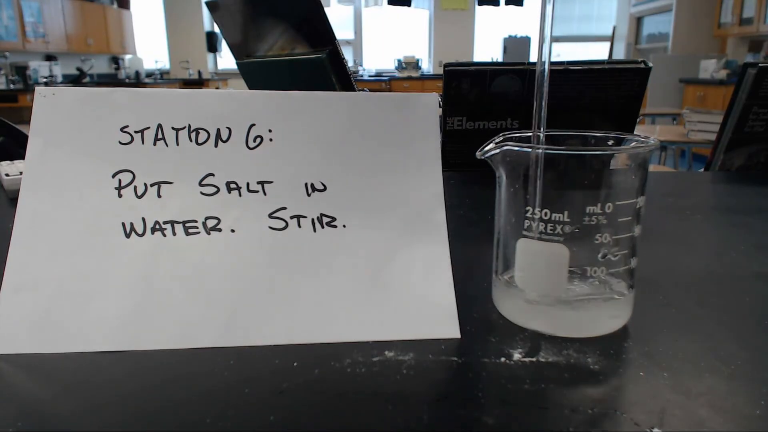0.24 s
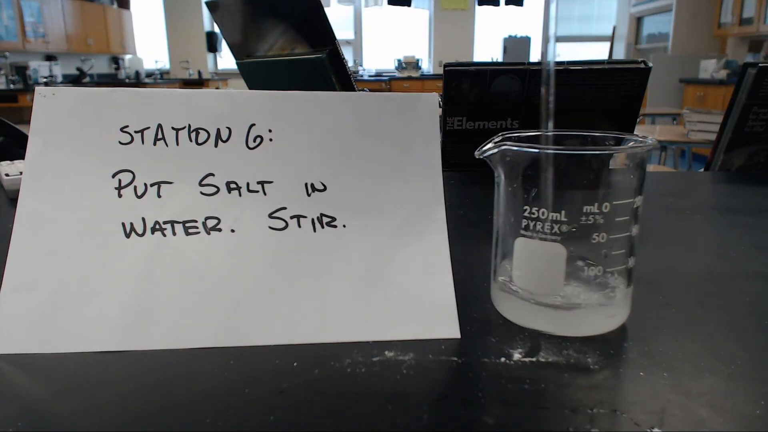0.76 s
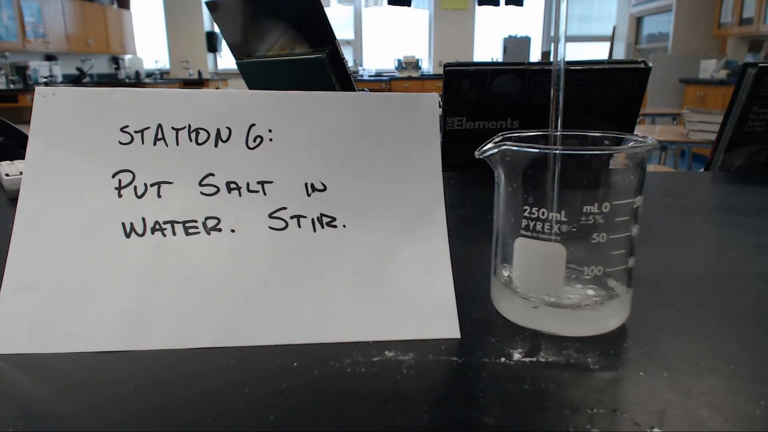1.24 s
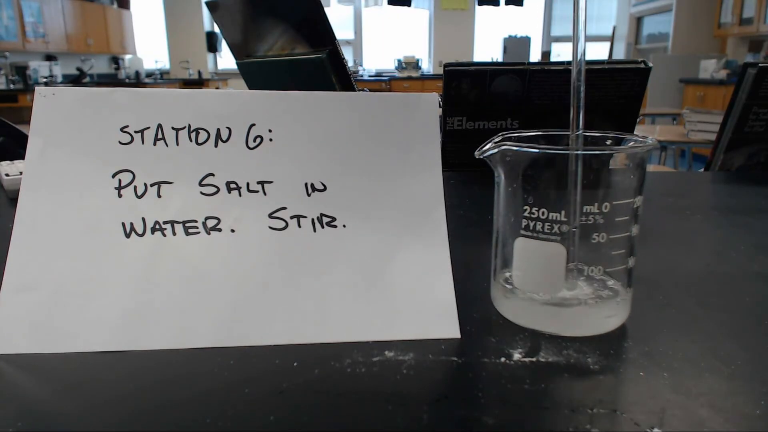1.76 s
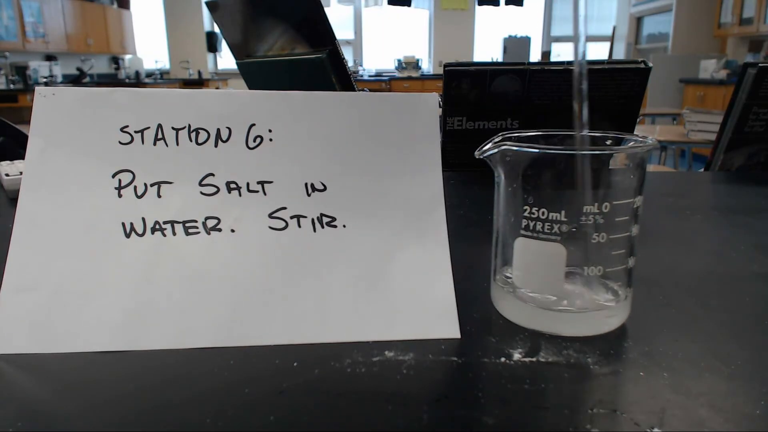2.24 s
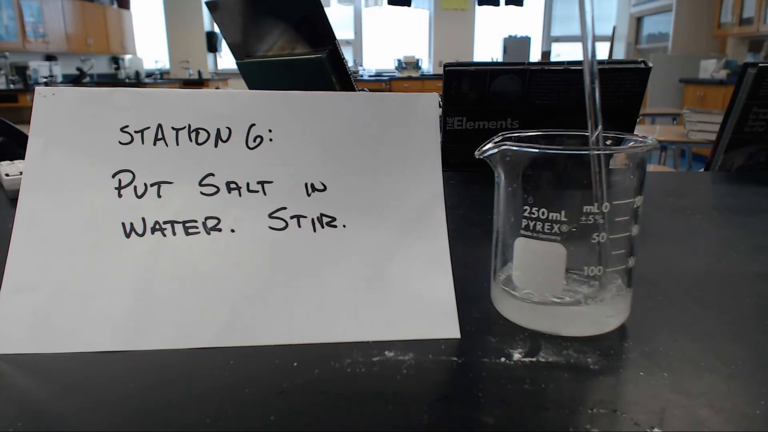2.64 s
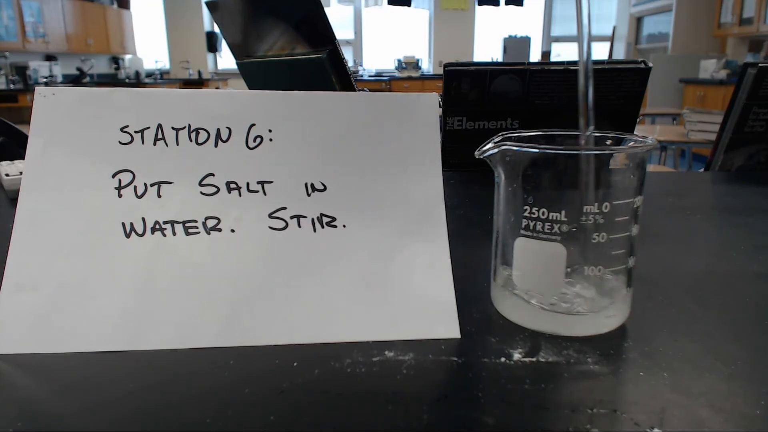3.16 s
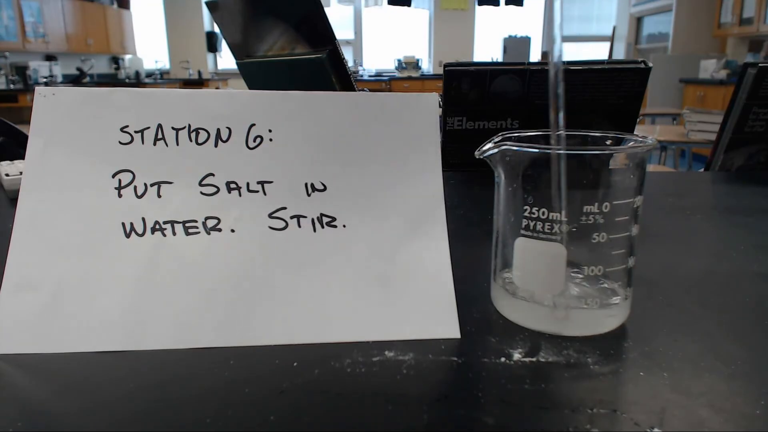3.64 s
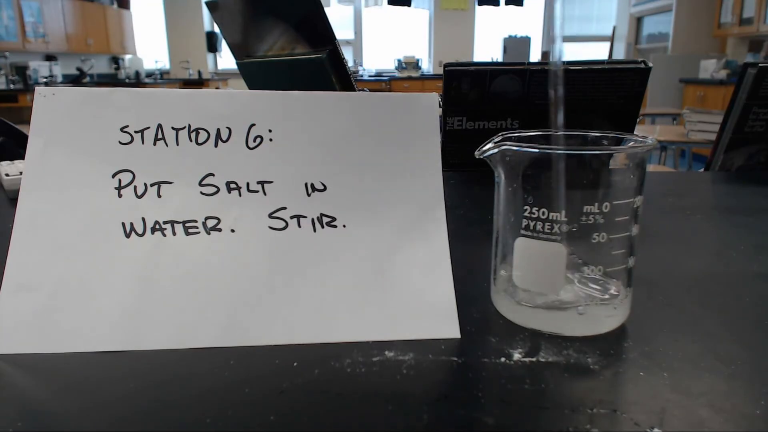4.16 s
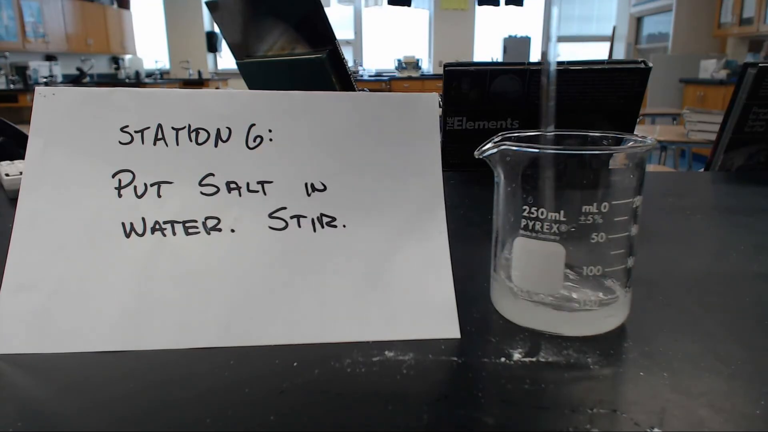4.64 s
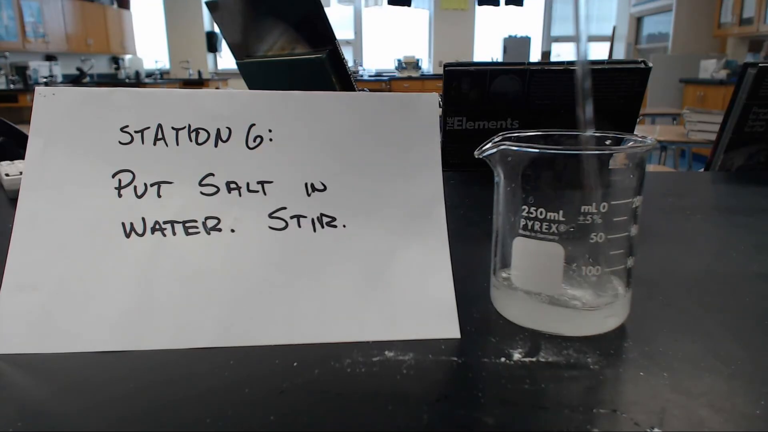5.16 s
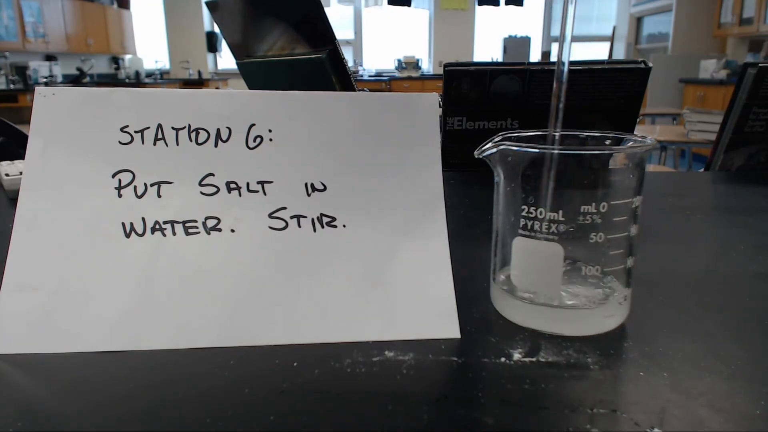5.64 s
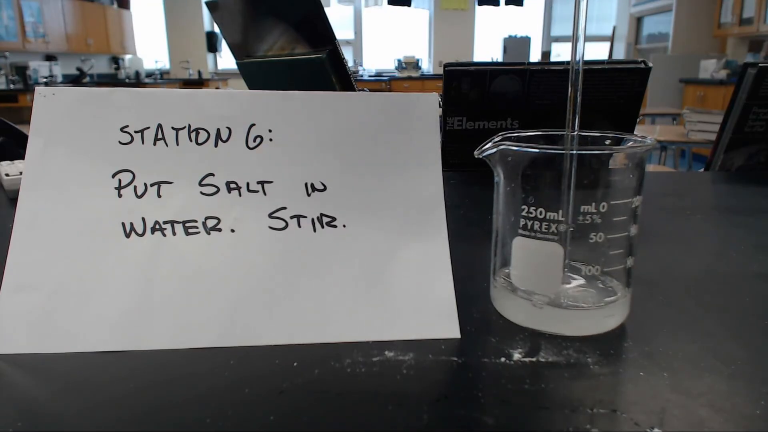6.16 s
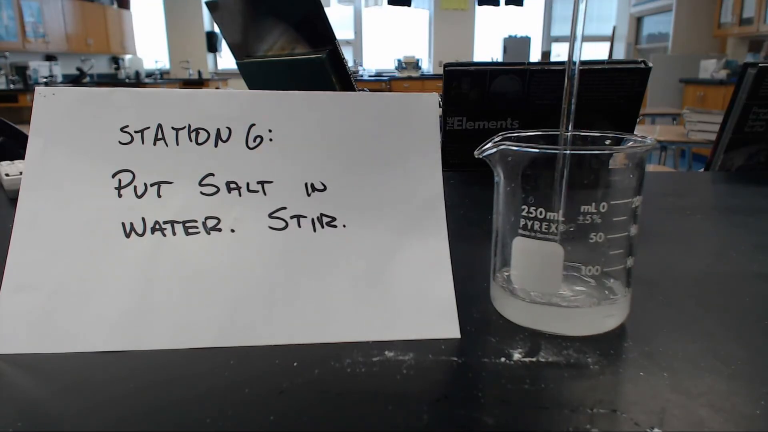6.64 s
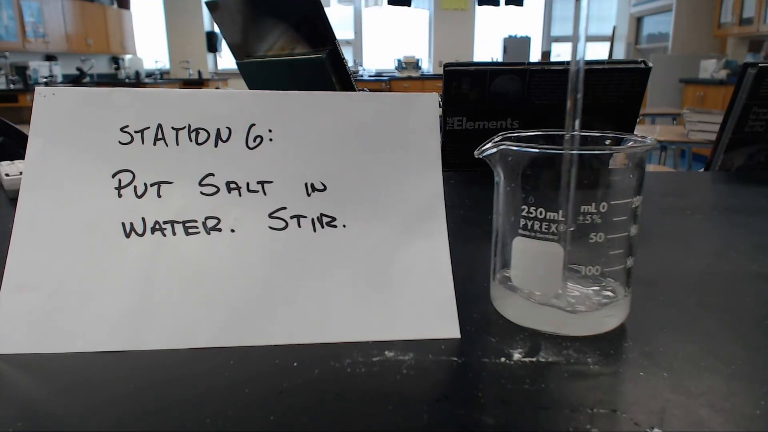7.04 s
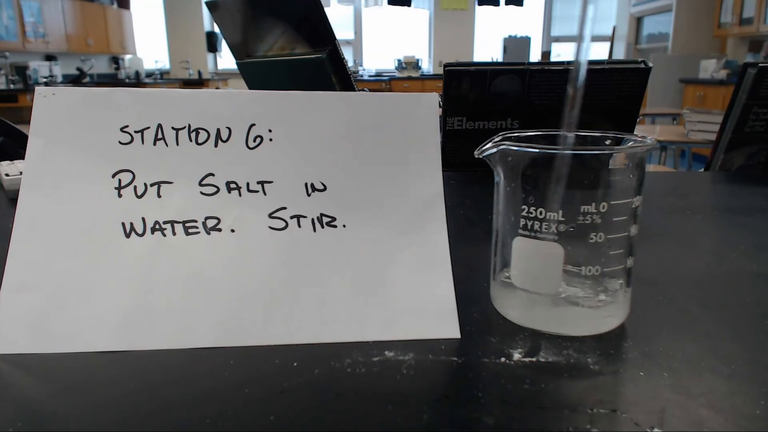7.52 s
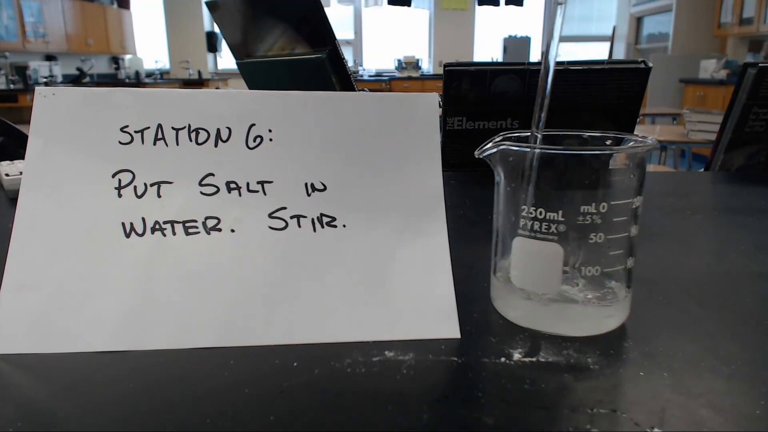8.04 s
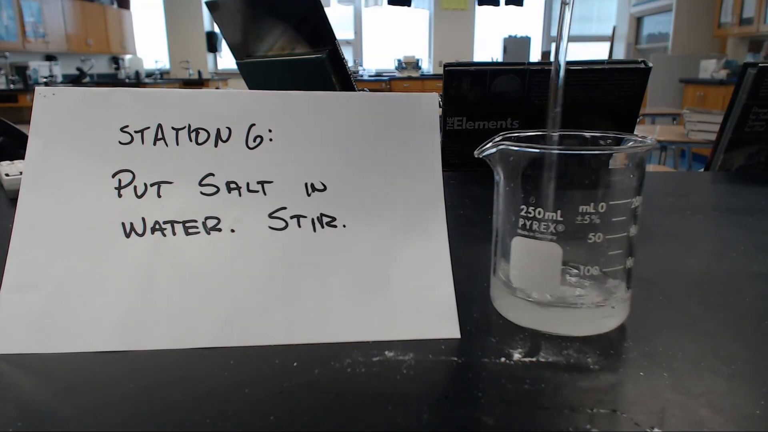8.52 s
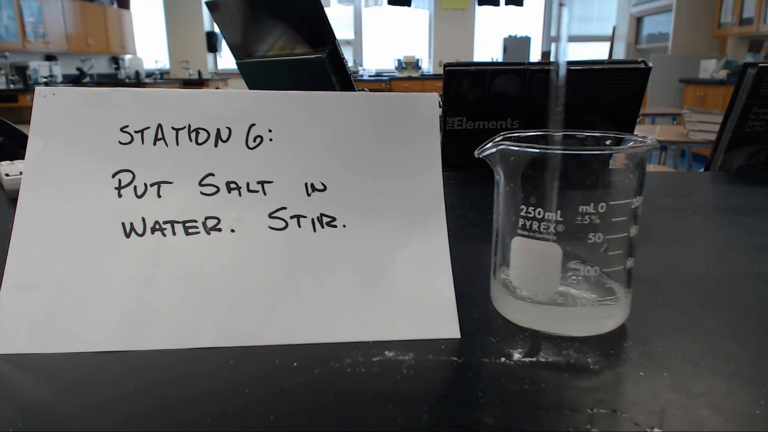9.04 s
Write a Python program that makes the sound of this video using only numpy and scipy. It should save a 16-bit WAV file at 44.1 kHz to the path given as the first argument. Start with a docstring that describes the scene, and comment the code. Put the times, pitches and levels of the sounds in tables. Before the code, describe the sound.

A glass rod stirs salt into shallow water in a glass beaker, heard very close with a thin, band-limited microphone that overloads on hard hits. Light ticks lead to a loud clink at 0.2 seconds, then a cluster at 0.5-0.9 with a gritty salt scrape. From 1 to 2 the clinks are sparser and softer; from 2.2 to 4.5 they come steadily, about every 0.2 seconds, with tiny bounces. A brisk flurry runs 4.9-5.7, some blows thudding in the bench, then a short gap, single hits at 6.2 and a hard one at 6.55. From 7.2 the pace rises, becoming a crowded bright rattle from 7.8 to 8.8, with last strong clinks around 9-9.2. Each is a sharp crack with a short hollow, glassy ring. Faint watery, grainy swishing comes and goes; a small dry room and barely audible ventilation lie behind.

```python
"""In a laboratory, a glass rod stirs salt into a little water and clinks unevenly on a glass beaker.
Each blow on wall or bottom cracks and excites decaying modes of the beaker, the rod and the air above
the water; hard blows thud in the bench. Salt grains grate as narrow-band noise, and water and salt wash
the wall as noise filtered by the modes. A close narrow-band microphone overloads on the hardest blows,
with a little reverberation and a faint ventilation rumble behind."""
import sys
import numpy as np
from scipy import signal
from scipy.fft import rfft, irfft
from scipy.io import wavfile
from scipy.ndimage import uniform_filter1d

SR = 44100
rng = np.random.default_rng(int(sys.argv[2]) if len(sys.argv) > 2 else 0)


def master(y):
    """Save y as 16-bit WAV."""
    cut = np.clip(np.atleast_2d(y).T, -1, 1)
    pcm = np.round(cut * 32767)  # scale
    wavfile.write(sys.argv[1], SR, pcm.astype(np.int16))


N = 409688

# Spectrum of the ventilation: (frequency [Hz], relative density [dB])
RUMBLE_SPECTRUM = [(50, -20.5), (162, 4), (263, -11), (384, -22), (8000, -34.5), (10400, -105)]
# Decay of the room: (frequency [Hz], t60 [s])
ROOM_DECAY = [(1000, 0.16), (8000, 0.18)]
# Strength of the water's swirl: (time [s], level [dB])
SWIRL_LEVEL = [(0, -53.5), (.95, -47), (1.081, -111), (1.3, -50), (2.05, -62), (2.199, -83.5),
               (2.45, -91.5), (2.598, -48.5), (3.701, -65), (4.501, -44), (4.85, -49.5), (5.651, -51),
               (5.801, -100), (6.401, -66.5), (6.6, -48.5), (7.099, -68), (7.4, -46), (9.29, -54.5)]
# Scrapes of the rod through salt: (time [s], peak level [dB], starting pitch [Hz], length [s])
SALT_RUBS = [(0.344, -35, 4360, 0.047), (0.605, -31.5, 4150, 0.046), (0.761, -14, 4000, 0.044),
             (2.267, -35.5, 3140, 0.045), (4.305, -33.5, 4090, 0.088), (6.579, -33.5, 4140, 0.15),
             (7.059, -29, 4050, 0.13), (7.325, -32, 4510, 0.031), (7.475, -27, 2850, 0.064),
             (7.921, -26.5, 2860, 0.093), (8.874, -29, 4100, 0.059)]
# Light touches of the rod and blips of the water: (time [s], peak level [dB], pitch [Hz])
LIGHT_TICKS = [(.004, -25.5, 1005), (0.029, -32, 3290), (0.112, -30, 4140), (0.121, -17, 916),
               (0.201, -25.5, 3300), (0.3, -26, 880), (0.311, -25.5, 4730), (0.524, -23, 710),
               (1.332, -29, 830), (1.556, -23.5, 1920), (1.867, -36.5, 4070), (1.95, -29, 3270),
               (2.384, -40.5, 3440), (2.554, -38, 2390), (2.371, -40.5, 1320), (2.679, -28.5, 3140),
               (2.852, -24.5, 1320), (2.885, -40, 7540), (2.91, -32, 3350), (3.165, -28.5, 4020),
               (3.476, -24, 860), (3.659, -32, 800), (4.09, -25.5, 874), (4.265, -24, 792),
               (4.665, -37.5, 2540), (4.728, -37, 4110), (4.396, -14.5, 1010), (5.611, -27.5, 3240),
               (6.395, -22.5, 833), (7.359, -21.5, 930), (7.577, -26.5, 4150), (8.845, -30.5, 807)]
# Hard blows heard in the bench: (time [s], level of each note before its onset [dB])
BENCH_THUDS = [(0.217, -5), (0.782, 6), (4.91, 5), (5.002, 1), (6.552, 11.5), (7.998, 5.5), (9.134, -1.5)]
# Long clear wall tones, low, high and twin of the high one: (frequency [Hz])
WALL_TONES_HZ = [1486, 4097, 4011]
# The same tones: (t60 [s], wavering [dB], response level when grains and water stir it [dB])
WALL_TONES = [(0.31, 3.5, -18), (0.28, 3.5, -22), (0.25, 8, -22)]
# Modes rung by a blow: (frequency [Hz])
MODES_HZ = [580, 690, 795, 892, 1046, 1263, 1955, 2700, 3270, 3403, 4220, 4480, 5900, 7045, 7422, 7522]
# The same modes: (level [dB], t60 [s])
MODES = [(-8, 0.045), (-9, 0.04), (-4, 0.051), (-3, 0.057), (-9, 0.04), (-12, 0.064), (-4, 0.022),
         (-17, 0.032), (-9.5, 0.029), (0.5, 0.036), (3.5, 0.018), (0, 0.016), (-8, 0.02), (-16, 0.13),
         (-1, 0.04), (-14, 0.13)]
# Centres of the zones air, low wall, rod, rim and high wall: (frequency [Hz])
ZONE_CENTRES_HZ = [850, 1600, 3400, 4300, 7300]
# Answer of these zones to a blow: (offset [dB], share of low ring [1], share of treble ring [1])
ZONE_ANSWERS = [(-3, 1, 0.22), (0, 0.71, 0.18), (-11, 0.26, 0.22), (-13.5, 0.025, 0.15), (-6, 0.023, 0.89)]
# Blows; deep ones ring low, sharp ones high: (time [s], peak level [dB], low ring drive [dB],
# treble ring drive [dB], low wall tone level [dB], high wall tone level [dB])
ROD_BLOWS = [(0.218, 8.5, -16, -14.5, -40, -38), (0.465, -5, -55, -16, -62, -49.5),
             (0.69, -7.5, -37.5, -25, -45.5, -46), (0.784, -0.5, -17.5, -19.5, -31.5, -29),
             (0.838, -2.5, -15, -33, -45, -35), (0.939, -9.5, -16, -45, -61.5, -61.5),
             (1.259, -11, -33, -16, -47.5, -36.5), (1.508, -4.5, -19, -20.5, -29, -38),
             (1.646, -16.5, -23.5, -101, -44.5, -42), (1.717, -9, -22.5, -65, -52.5, -43),
             (2.034, -21.5, -10.5, -93, -72, -63), (2.214, -1, -14.5, -11.5, -38.5, -33.5),
             (2.58, -5, -5, -19, -38.5, -35), (2.755, -15.5, -4.5, -41, -45, -54),
             (2.942, -7, -6, -30.5, -29.5, -34.5), (3.098, -1, -21.5, -16.5, -41, -63),
             (3.267, -5.5, -27, -7.5, -55.5, -72), (3.444, -4.5, -33.5, -10.5, -42, -50),
             (3.623, -23, 5, -25, -72, -50), (3.817, -4, -20.5, -46, -43, -37.5),
             (3.952, -3, -9, -58, -36, -35), (4.033, -11.5, -32.5, -16, -47, -46),
             (4.4, -1, -21.5, -18.5, -34.5, -28.5), (4.533, -6.5, -29.5, -8.5, -69, -45),
             (4.912, 0, -13.5, -15.5, -29.5, -26.5), (5.001, 0.5, -18.5, -15.5, -53, -44),
             (5.073, -7.5, -24, -59, -35, -39), (5.112, -6.5, -15.5, -24.5, -43, -35),
             (5.221, -10, -41, -10.5, -52.5, -43), (5.363, 3, -16.5, -40.5, -45, -38),
             (5.54, -2, -20.5, -13.5, -36.5, -31.5), (5.682, -1, -19.5, -7, -46, -41),
             (6.205, 0.5, -10.5, -39.5, -38.5, -36.5), (6.553, 5.5, -18.5, -31, -58.5, -32),
             (6.717, -1.5, -10.5, -24.5, -45, -28.5), (6.847, -7, -32, -5.5, -40.5, -45),
             (6.892, -4, -17.5, -39.5, -49, -36), (7.215, -5, -58, -8, -74, -35),
             (7.382, -5.5, -19.5, -6.5, -40, -56), (7.416, -13.5, -4.5, -46, -62, -45),
             (7.605, -1.5, -35, -20, -57, -38), (7.693, -3, -16.5, -16, -32.5, -45),
             (7.829, -10, -12, -43, -45, -44), (7.872, -3, -11.5, -15, -39.5, -28.5),
             (7.997, 1, -13, -14.5, -25.5, -23.5), (8.102, -0.5, -33.5, -18, -36.5, -36),
             (8.168, -3, -29, -29, -42, -29.5), (8.233, -3.5, -39, -12.5, -41, -43),
             (8.327, -1, -24, -16, -37, -24.5), (8.45, -3.5, -26.5, -22, -51, -31.5),
             (8.547, 1.5, -34.5, -39, -22, -36), (8.592, 2, -22.5, -18, -33, -43),
             (8.634, -1.5, -23, -31, -44, -27.5), (8.696, 5, -24, -22, -33.5, -37),
             (8.76, -8, -19, -55.5, -43, -50.5), (8.987, -4, -58, -24, -45, -36),
             (9.074, -1, -27.5, -16, -34, -20.5), (9.133, 0.5, -28, -28, -34, -28),
             (9.223, 6, -20.5, -14, -41, -23)]
# Bounces of the rod soon after a blow: (time [s], level relative to its blow [dB])
ROD_BOUNCES = [(0.239, -15.5), (0.794, -5), (3.1057, -14.5), (4.0437, -9), (5.0152, -17), (5.24, -13),
               (5.5546, -8.5), (5.696, -12.5), (7.618, -7), (8.2456, -7), (8.7142, -10)]

RUMBLE_DB = -69  # rms
SCRAPE_RISE_PER_S = 1.1  # climb as the rod speeds up, share of the starting pitch
TOUCH_T60, CLICK_T60 = 0.05, 0.02  # s
TWIN_DB = -9  # relative to the high wall tone
AIR_DRIFT = 0.024  # the low notes move with the sloshing water, share of pitch
WAVER_DB = 5.5  # moving water makes each ring waver
CROWD_HZ, CROWD_DB = 160, 7.0  # width and level spread of the short modes round each main one
CRACK_DB, CRACK_SHARE = 13.5, 0.58  # the crack grows with the treble ring
MIC_HZ, EDGE_HZ = 7900, 16600  # cutoffs before and after overload


def gain_of(db):
    """Logarithmic levels: 20 dB is a factor of ten in amplitude."""
    return 10 ** (np.asarray(db) / 20)


def evened(x):
    """Power normalization: scales to rms 1."""
    return x / np.sqrt(np.mean(x ** 2) + 1e-20)


def read(points_hz, values, hz):
    """Logarithmic frequency scale: interpolates in straight lines along it."""
    return np.interp(np.log(hz + 1), np.log(np.add(points_hz, 1)), values)


def add(mix, s, sound):
    """Superposition: adds a sound to the mix at s seconds."""
    part = mix[round(s * SR):][:len(sound)]
    part += sound[:len(part)]


def waver(depth_db, count):
    """Amplitude modulation: slow random level changes in dB, one row for each ring."""
    steps = evened(uniform_filter1d(rng.standard_normal((count, 160)), 5, 1))
    return uniform_filter1d(depth_db * steps.repeat(100, 1), 200, 1)


def glass(hz):
    """Modal superposition: sums resonances, of which long rings peak higher and narrower."""
    modes = [(f, db, t60) for f, (db, t60) in zip(MODES_HZ, MODES)]
    modes += [(f, db, t60) for f, (t60, _, db) in zip(WALL_TONES_HZ, WALL_TONES)]
    return sum(gain_of(db) * t60 / 3.2 / (1 + 1j * (hz - f) * t60) for f, db, t60 in modes)


def rumble():
    """Stationary broadband noise: the ventilation is white noise coloured towards the bass."""
    hz = np.fft.rfftfreq(N, 1 / SR)
    colour = gain_of(read(*np.transpose(RUMBLE_SPECTRUM), hz))
    noise = irfft(rfft(rng.standard_normal(N)) * colour, N)
    return gain_of(RUMBLE_DB) * evened(noise)


def lab(x):
    """Reverberation: convolution with taps of random sign, each band dying at its own speed."""
    taps = np.zeros(SR // 2)
    at = np.arange(120, SR // 2 - 20, 20)
    taps[at + rng.integers(0, 20, len(at))] = rng.choice([-1., 1.], len(at))
    hz, t, z = signal.stft(taps, SR, nperseg=256)
    t60 = read(*np.transpose(ROOM_DECAY), hz)[:, None]
    tail = signal.istft(z * gain_of(-60 * t / t60), SR, nperseg=256)[1]
    return signal.fftconvolve(x, tail / np.linalg.norm(tail))[:N]


def slosh(patchy_db=4.0, surge_db=6.5, grit_db=4.0, tilt_db=1.5, dull_db=-9,
          air_db=-21, air_hz=850, width_hz=130):
    """Filtered turbulence: water and salt noise passes through the modes and air in patches and surges."""
    frames, hz = N // 64 + 5, np.fft.rfftfreq(256, 1 / SR)
    a, b, patches = rng.standard_normal((frames, len(hz), 3)).T
    patches = evened(uniform_filter1d(uniform_filter1d(patches, 4, 0), 18, 1))
    surges = evened(uniform_filter1d(rng.standard_normal(frames), 22))
    # grains knock in eight frequency bands
    knocks = np.minimum(uniform_filter1d(rng.exponential(1, (frames, 8)), 2, 0), 5)
    grit = knocks.repeat(17, 1)[:, :len(hz)].T
    z = (a + 1j * b) * gain_of(patchy_db * patches + surge_db * surges + grit_db * grit)
    wash = signal.istft(z, nperseg=256, noverlap=192)[1][:N]
    fine_hz = np.fft.rfftfreq(N, 1 / SR)
    air = gain_of(air_db) / (1 + ((fine_hz - air_hz) / width_hz) ** 2)
    tilt = tilt_db * np.log2(fine_hz / 1000 + .01)  # dB per octave
    colour_db = tilt - 64 * (fine_hz < 480) + dull_db * (fine_hz > 5000)
    colour = (abs(glass(fine_hz)) + air) * gain_of(colour_db)
    swirl_db = np.interp(np.arange(N) / SR, *np.transpose(SWIRL_LEVEL))
    return evened(irfft(rfft(wash) * colour, N)) * gain_of(swirl_db)


def rubs(sharpness=22, wide_db=7, lumpy_db=3.5, skew=1.4):
    """Friction noise: crushed grains swell in a narrow climbing band that stirs the glass a little."""
    out, t, hz = np.zeros(N), np.arange(8192) / SR, np.fft.rfftfreq(8192, 1 / SR)
    for s, peak_db, pitch_hz, length in SALT_RUBS:
        grains, other, lumps = rng.standard_normal((3, 8192))
        swell = np.sin(np.pi * np.minimum(t / length, 1) ** skew)
        stroke = swell * gain_of(lumpy_db * evened(uniform_filter1d(lumps, 200)))
        # narrow noise round 0 Hz, then shifted up to the gliding pitch
        r = np.exp(-2 * np.pi * pitch_hz / sharpness / SR)
        slow = signal.lfilter([(1 - r) ** 2], [1, -2 * r, r ** 2], (grains + 1j * other) * stroke)
        cycles = pitch_hz * (t + SCRAPE_RISE_PER_S * t ** 2 / 2)
        band = 2 * (slow * np.exp(2j * np.pi * cycles)).real
        wide = gain_of(wide_db) * rfft(grains * stroke) * glass(hz)
        sound = irfft(rfft(band) * (1 + glass(hz)) + wide)
        add(out, s, gain_of(peak_db) * sound / abs(sound).max())
    return out


def ticks(width_hz=150, wide_db=9, dull_hz=4500, click_db=-21, ragged_db=9.5):
    """Resonant excitation: a gritty touch rings its note and, fainter, the glass, with a ragged click."""
    out, t, hz = np.zeros(N), np.arange(8192) / SR, np.fft.rfftfreq(8192, 1 / SR)
    for s, peak_db, pitch_hz in LIGHT_TICKS:
        touch, click, ragged = rng.standard_normal((3, 8192))
        patch = 1 / (1 + 1j * (hz - pitch_hz) / width_hz) ** 2
        whole = gain_of(wide_db) * glass(hz) / (1 + (hz / dull_hz) ** 4)
        ring = rfft(touch * gain_of(-60 * t / TOUCH_T60)) * (patch * (1 + glass(hz)) + whole)
        # the unevenness of the click runs along frequency
        ragged_colour = gain_of(ragged_db * evened(uniform_filter1d(ragged[:len(hz)], 100)))
        click = irfft(rfft(click) * ragged_colour)
        sound = irfft(ring) + gain_of(click_db - 60 * t / CLICK_T60) * evened(click)
        add(out, s, gain_of(peak_db) * sound / abs(sound).max())
    return out


def thuds():
    """Damped vibration: the bench top gives three close, dull notes with a soft onset."""
    out, t = np.zeros(N), np.arange(2048) / SR
    onset = 1 - np.exp(-t / 0.0072)
    for s, level_db in BENCH_THUDS:
        thud = sum(np.sin(2 * np.pi * hz * t) for hz in (250, 380, 520))
        add(out, s, gain_of(level_db - 60 * t / 0.01) * thud * onset)
    return out


def wall(low_db, high_db):
    """Weakly damped modes: the wall sings on; where the rod lands sets how loud each tone is."""
    t = np.arange(16000) / SR
    t60, depth_db, _ = np.transpose(WALL_TONES)[:, :, None]
    size_db = np.c_[[low_db, high_db, high_db + TWIN_DB]] + waver(depth_db, count=len(WALL_TONES))
    cycles = np.c_[WALL_TONES_HZ] * t + rng.random((len(WALL_TONES), 1))
    tones = gain_of(size_db - 60 * t / t60) * np.sin(2 * np.pi * cycles)
    return tones.sum(0) * (1 - np.exp(-t / 0.00033))


def blow(crack_level_db, zone_db, ring_db=5, spread_db=5.0, crack_db=-7, crack_t60=0.024,
         contact_s=0.0015):
    """Impact excitation: a crack and a ring, each blow sharing its energy among the modes in its own way."""
    t, hz = np.arange(9000) / SR, np.fft.rfftfreq(2048, 1 / SR)
    count, centre_hz = len(MODES), np.c_[MODES_HZ]
    db, t60 = np.transpose(MODES)[:, :, None]
    spot, drift, band = rng.standard_normal((count, 3, 1)).transpose(1, 0, 2)
    mode_hz = centre_hz * (1 + AIR_DRIFT * drift * (centre_hz < 1100))
    size_db = db + read(ZONE_CENTRES_HZ, zone_db, mode_hz) + ring_db + spread_db * spot
    size_db = size_db + waver(WAVER_DB, count=count)[:, :len(t)]
    cycles = mode_hz * t + rng.random((count, 1))
    sound = (gain_of(size_db - 60 * t / t60) * np.sin(2 * np.pi * cycles)).sum(0)
    # many short modes crowd round the main ones
    crowd = gain_of(CROWD_DB * band) / (1 + ((hz - mode_hz) / CROWD_HZ) ** 2)
    colour = np.linalg.norm(crowd, axis=0) * gain_of(read(ZONE_CENTRES_HZ, zone_db, hz))
    chatter = evened(irfft(rfft(rng.standard_normal(2048)) * colour))
    # the tip skips and rattles
    chatter *= gain_of(7.8 * evened(uniform_filter1d(rng.standard_normal(2048), 60)))
    sound[:2048] += gain_of(crack_level_db + crack_db - 60 * t[:2048] / crack_t60) * chatter
    return sound * (1 - np.exp(-(t / contact_s) ** 2))  # builds up while rod and wall touch


def strike(peak_db, low_db, treble_db):
    """Impact spectrum: depth and sharpness of the blow set crack and zone levels; force sets the peak."""
    offset_db, low, treble = np.transpose(ZONE_ANSWERS)
    zone_db = offset_db + low * low_db + treble * treble_db
    sound = blow(CRACK_DB + CRACK_SHARE * treble_db, zone_db)
    return gain_of(peak_db) * sound / abs(sound).max()


def blows():
    """Repeated impact: a bounce has the colour settings of the blow before it, only weaker."""
    out, rows = np.zeros(N), np.array(ROD_BLOWS)
    for s, *how, low_db, high_db in rows:
        add(out, s, strike(*how))
        add(out, s, wall(low_db, high_db))
    for s, weaker_db in ROD_BOUNCES:
        _, peak_db, *colour, _, _ = rows[rows[:, 0] < s][-1]
        add(out, s, strike(peak_db + weaker_db, *colour))
    return out


def scene():
    """Direct and reverberant sound: the beaker close by, a little room behind it."""
    small = blows() + ticks() + rubs() + slosh()
    no_bass = signal.butter(2, 380, "high", fs=SR, output="sos")  # the beaker is too small for bass
    beaker = signal.sosfilt(no_bass, small) + thuds()
    return (beaker + gain_of(-13.5) * lab(beaker) + rumble())[None]


def record(dry):
    """Transducer saturation: bass cut and narrow microphone path, smooth overload, then the band limit."""
    thin = signal.sosfilt(signal.butter(2, 120, "high", fs=SR, output="sos"), dry)
    mic = signal.firwin(301, MIC_HZ, window=("kaiser", 10), fs=SR)
    narrow = signal.oaconvolve(thin, mic[None], "same")
    clipped = narrow / (1 + (narrow / .72) ** 8) ** (1 / 8)  # levels off at 0.72
    edge = signal.firwin(511, EDGE_HZ, window=("kaiser", 9), fs=SR)
    return signal.oaconvolve(clipped, edge[None], "same")


dry = scene()
out = record(dry)
master(out)
```